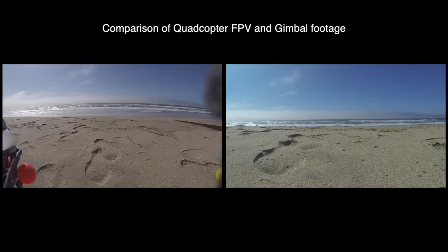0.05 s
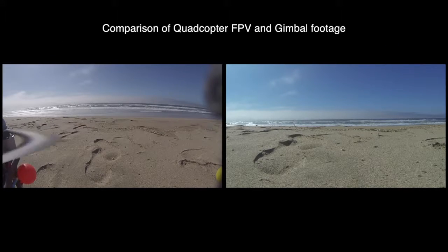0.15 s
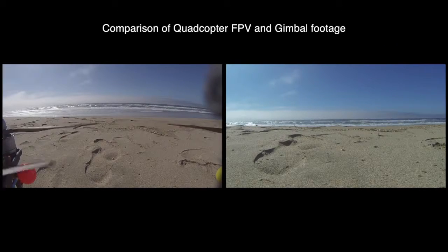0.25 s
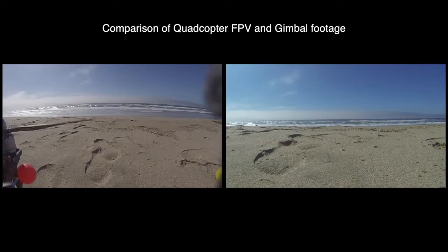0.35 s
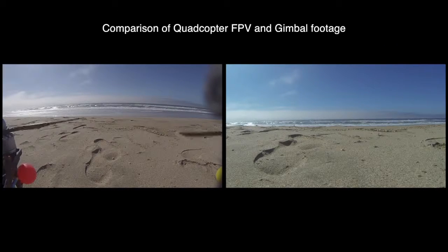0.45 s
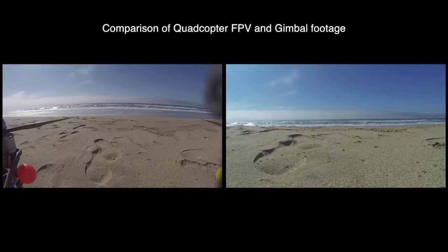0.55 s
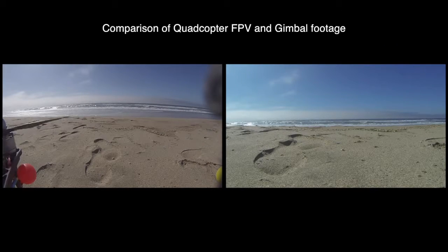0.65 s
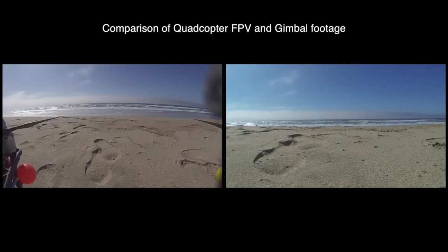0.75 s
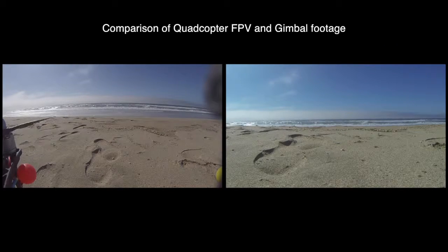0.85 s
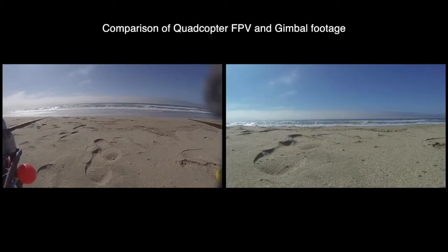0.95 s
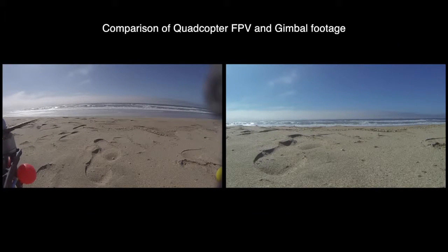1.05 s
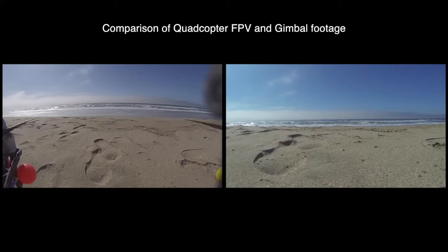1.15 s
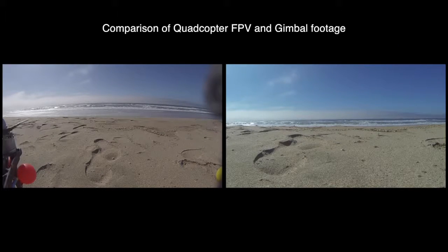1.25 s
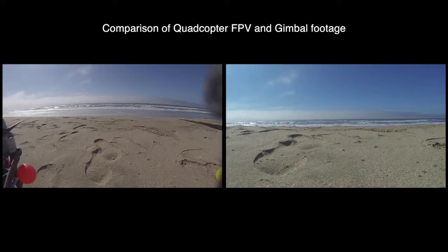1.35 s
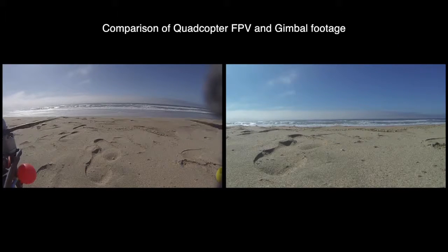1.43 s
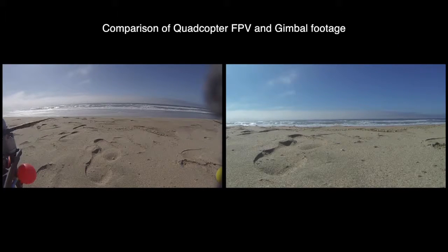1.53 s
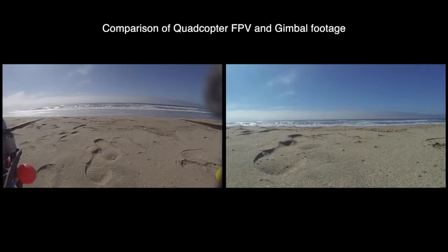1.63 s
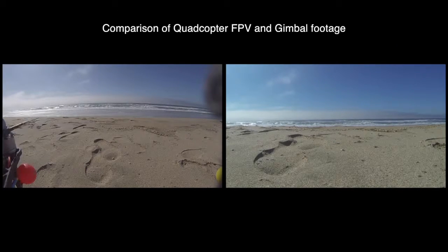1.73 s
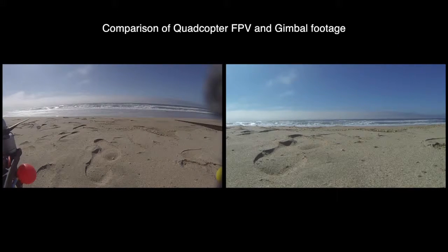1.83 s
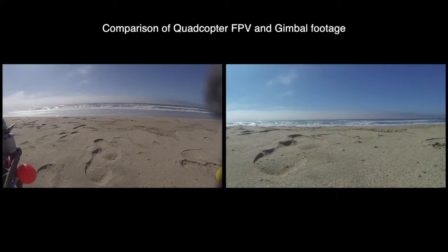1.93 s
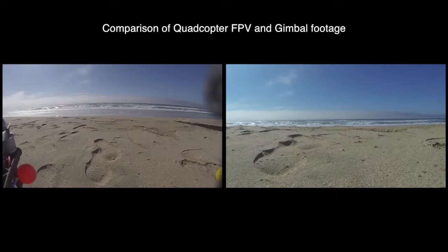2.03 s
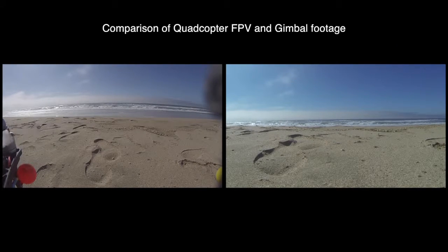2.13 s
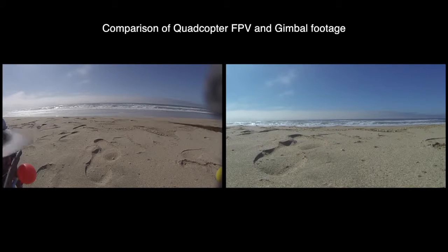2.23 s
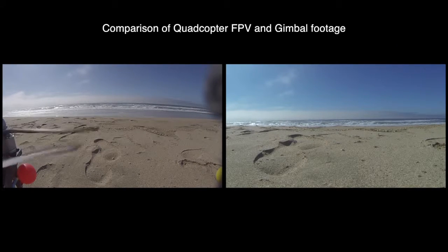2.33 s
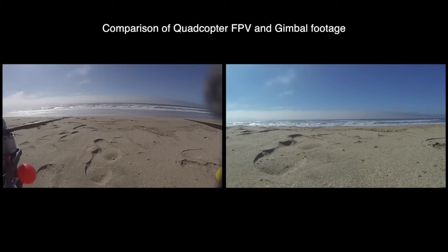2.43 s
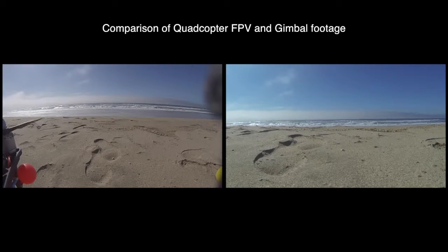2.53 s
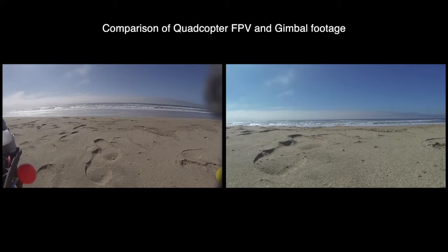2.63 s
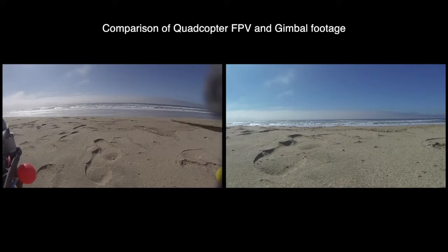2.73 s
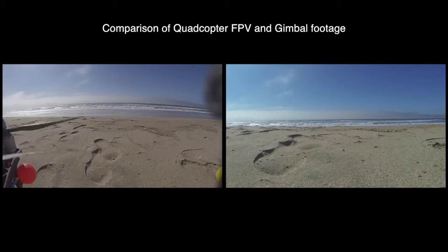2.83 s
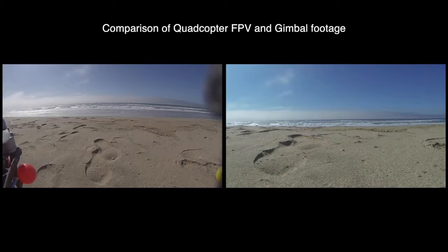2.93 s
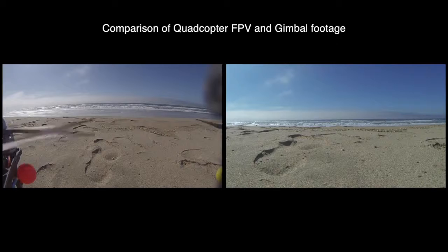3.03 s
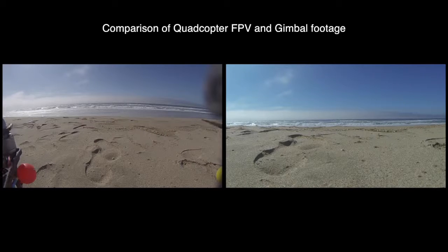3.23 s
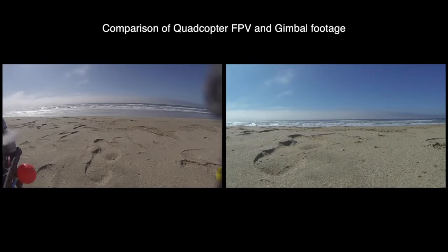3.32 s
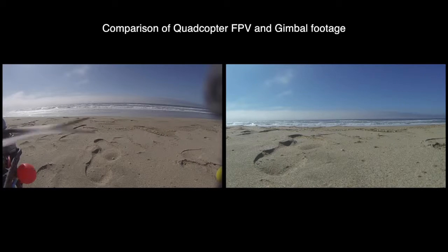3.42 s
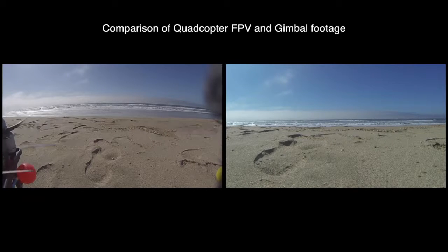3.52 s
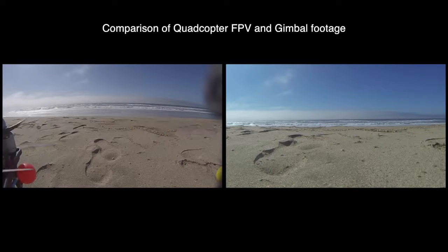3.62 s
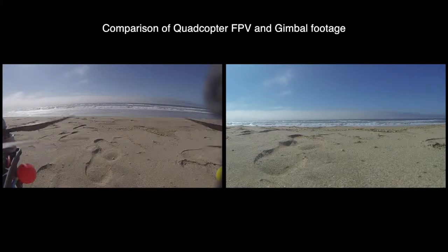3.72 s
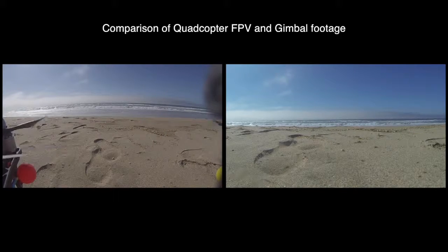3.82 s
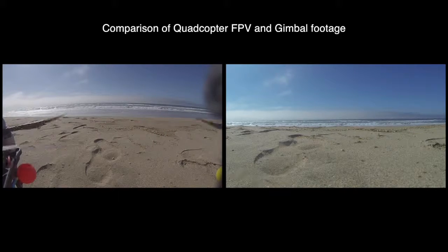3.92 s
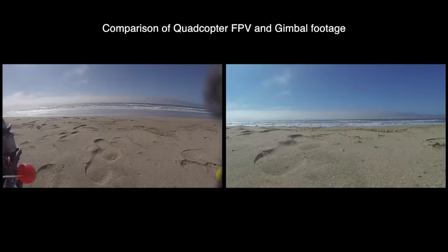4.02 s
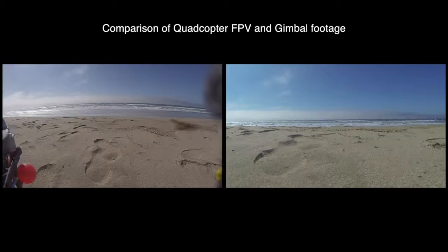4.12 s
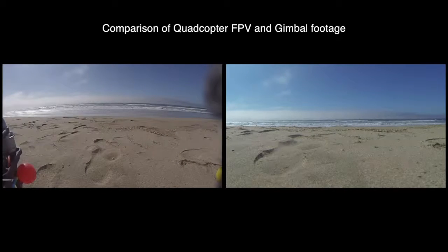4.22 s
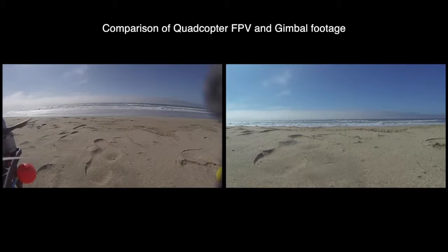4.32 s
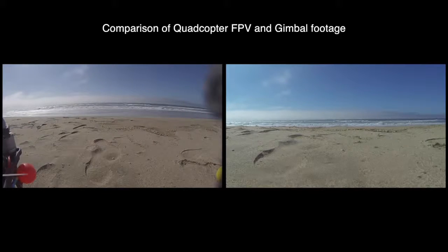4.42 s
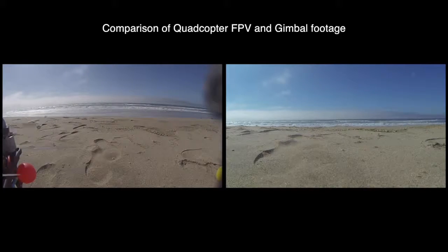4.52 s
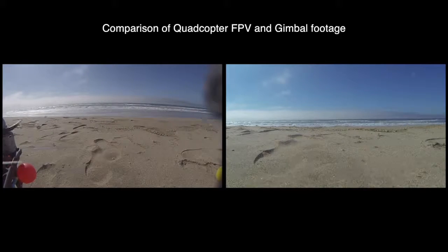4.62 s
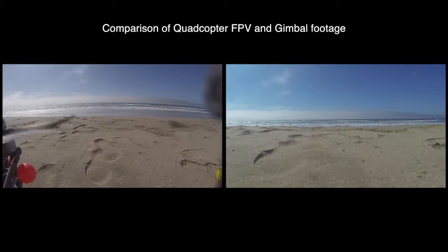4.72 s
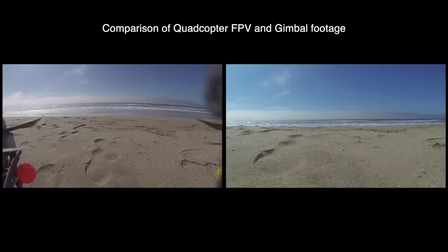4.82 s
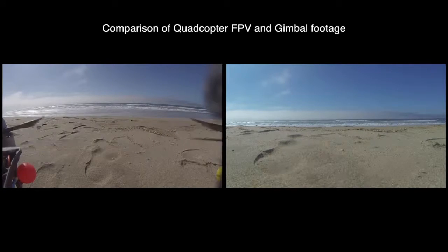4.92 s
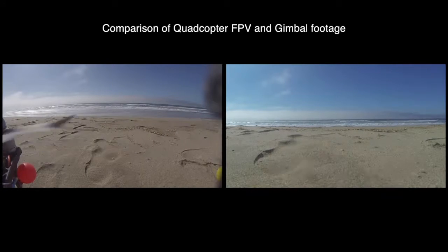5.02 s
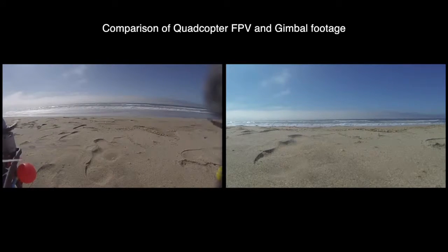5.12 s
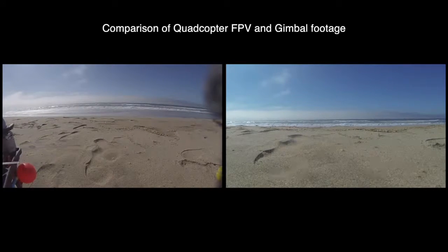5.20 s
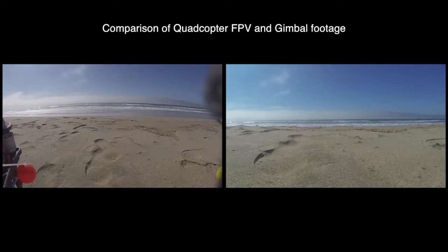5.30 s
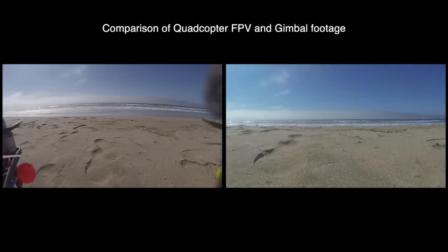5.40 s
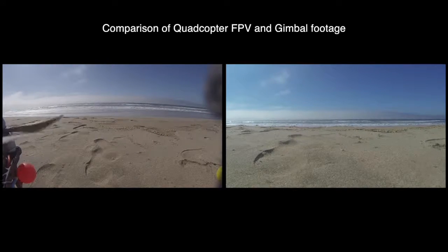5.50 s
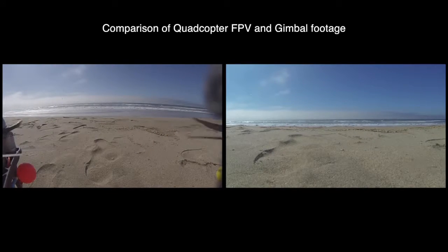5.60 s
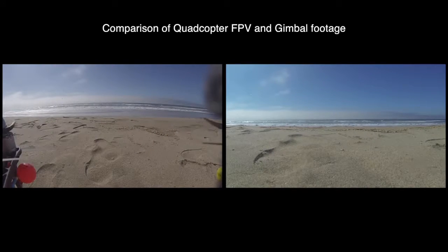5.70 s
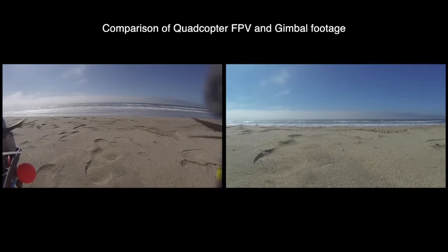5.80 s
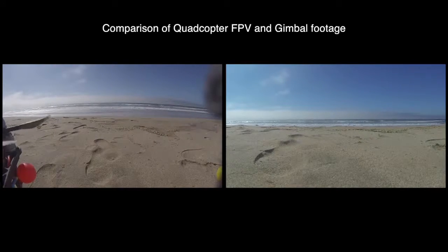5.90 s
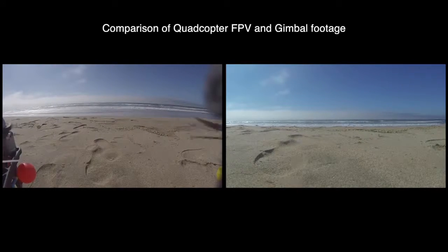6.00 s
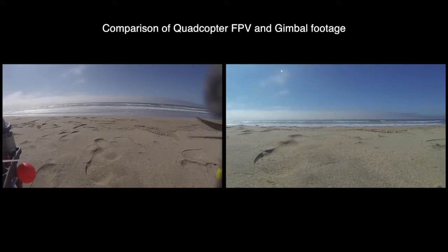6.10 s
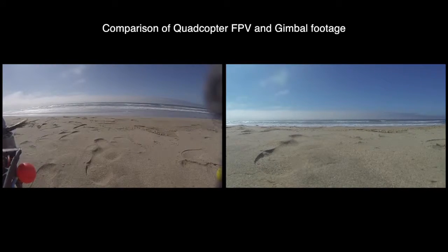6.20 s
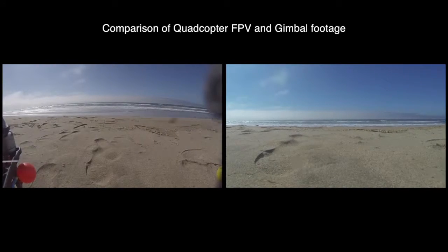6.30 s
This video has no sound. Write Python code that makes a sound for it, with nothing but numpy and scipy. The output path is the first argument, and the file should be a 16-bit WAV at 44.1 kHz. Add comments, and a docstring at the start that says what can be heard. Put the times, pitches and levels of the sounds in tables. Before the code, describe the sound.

A small drone idles with a faint high whine over surf, then spins up and lifts off with a rising buzz and gusting propeller wind.

```python
"""A quadcopter idles on a beach, spins up and lifts off, heard from a microphone on its frame.
Its two-bladed propellers hum, one pressure pulse per blade pass. Four motors sing at their
controllers' switching pitch and ring the frame. Once the throttle opens, the blades hiss and
blow gusts over the microphone. Surf washes behind throughout."""
import sys
import numpy as np
from scipy import signal
from scipy.fft import rfft, irfft
from scipy.io import wavfile
from scipy.ndimage import uniform_filter1d

SR = 44100
rng = np.random.default_rng(int(sys.argv[2]) if len(sys.argv) > 2 else 0)


def to_wav(s):
    """Save 16-bit WAV."""
    ch = np.atleast_2d(s).T  # columns
    pcm = np.round(np.clip(ch, -1, 1) * 32767)  # PCM
    wavfile.write(sys.argv[1], SR, pcm.astype(np.int16))


N = 280035
T = np.arange(N) / SR
HZ = np.fft.rfftfreq(N, 1 / SR)
THROTTLE_S, THROTTLE_RAMP_S = 2.439, 0.0079
LIFT_OFF_S, LIFT_OFF_RAMP_S = 3.5, 0.14
IDLE_HZ, LIFT_HZ = 39.28, 111  # blade-pass rates

# Common propeller speed, throttle open: (time [s], blade-pass rate [Hz])
BLADE_RATE = [(2.45, 41.2), (2.59, 55.5), (2.68, 63.4), (2.85, 73.45), (3.23, 96.65), (3.56, 114.6),
              (3.82, 124.5), (4.11, 135.9), (4.38, 144.6), (4.75, 154.1), (5.68, 177.3), (6.01, 183.8),
              (6.35, 198)]
# Lead of one propeller pair; odd harmonics dip at a half: (time [s], lead [blade passes])
PAIR_LEAD = [(0.88, 0.05), (1.02, 0.45), (2.55, 0.5), (2.7, 0.79), (3.09, 2.23), (3.2, 2.46), (3.59, 3.02),
             (4.01, 3.17), (4.32, 3.13), (4.76, 3.04), (5.26, 2.82), (5.55, 2.81), (5.98, 2.74),
             (6.02, 2.66), (6.35, 2.42)]
# Hum envelope: (time [s], gain [dB])
HUM_GAIN = [(0.03, -22.5), (2.27, -38), (2.86, -11.5), (3.07, -23.5), (3.17, -11.5), (3.67, -13.5),
            (3.98, -16), (4.39, -11.5), (4.83, -12), (5.97, -12), (6.35, -8)]
# Blade-pass harmonics 1-4: (relative level [dB])
BLADE_HARMONICS_DB = [0.3, -3.5, -9, -15.5]
# Motors: (switching pitch [Hz], speed / common speed [ratio])
MOTOR_TUNING = [(8021.9, .988), (8034.2, 1.), (8050.4, 1.011), (8077.2, 1.003)]
# Share of the whine per motor: (relative level [dB])
MOTOR_SHARE_DB = [-6, -4.5, -10, -4]
# Frame and housing resonances: (centre [Hz], width [Hz], gain [dB])
FRAME_MODES = [(2390, 590, -9), (3850, 890, -11), (4560, 190, -2), (4837, 270, 6.5), (7320, 730, -9),
               (8236, 610, -1), (15100, 600, -15)]
# Motor whistles: (switching pitch [multiple], magnet-pole rate [multiple], speed [ratio])
WHISTLE_ORDERS = [(1, -1, 1), (1, 1, 1), (1, -4, .98), (1, -4, .88), (1, -5, 1), (1, -7, .97), (0, 3, 1),
                  (0, 4, 1), (0, 4, 1), (0, 4, .905), (0, 5, 1), (0, 6, 1), (0, 6, 1), (0, 7, 1), (0, 9, 1)]
# Resonance of each whistle, same order: (centre [Hz], width [Hz], gain [dB])
WHISTLE_MODES = [(7850, 3400, -20), (8950, 2200, -23), (4750, 240, -8), (4490, 130, -11.5),
                 (4815, 300, -9.5), (4770, 260, -10), (2460, 1104, -21), (4952, 320, -0.5), (4640, 60, -10),
                 (4938, 530, -6), (4770, 315, -5), (4250, 1000, -19), (2520, 440, -23), (5000, 500, -23),
                 (6200, 1300, -28.5)]
# Surf and sea wind: (frequency [Hz], relative density [dB])
SURF_SPECTRUM = [(20, 3.5), (45, 1.5), (90, 0.5), (200, -2.5), (400, -7), (700, -13.5), (1200, -24.5),
                 (2000, -30), (3300, -34.5), (6500, -37.5), (10000, -44.5), (14000, -46.5)]
# Swell of the surf's low band: (time [s], gain [dB])
SURF_SWELL = [(0, -2), (1.0, -1.5), (1.5, 1), (2.3, 1.7), (3.0, 5.5)]
# Blade-tip turbulence: (frequency [Hz], relative density [dB])
HISS_SPECTRUM = [(200, 21), (1000, 5.5), (2500, 7), (4000, 6.5), (6500, 4.5), (9500, 1), (12000, -0.5),
                 (15000, 1)]
# Downwash rumble: (frequency [Hz], relative density [dB])
RUMBLE_SPECTRUM = [(15, 4), (35, 6.5), (70, 2.5), (130, -3), (250, -12), (450, -16), (800, -35),
                   (2000, -42)]
# Downwash bursts: (frequency [Hz], relative density [dB])
FLUTTER_SPECTRUM = [(60, -19), (250, -3.5), (600, 2), (1000, 2.5), (1500, -2.5), (2200, -12), (3200, -24.5),
                    (6000, -42), (14000, -34)]
# Downwash gusts: (time [s], half length [s], rumble boost [dB], flutter boost [dB])
WASH_GUSTS = [(3.06, 0.098, 8, -2), (3.4, 0.076, 7, -10), (3.694, 0.13, 4, 2.5), (3.962, 0.17, -1.5, 5),
              (4.16, 0.14, 8, 1), (4.438, 0.11, -4, 4), (4.688, 0.086, -1, 4.5), (5.238, 0.13, 4, 6),
              (5.786, 0.05, 6, 0.5), (6.027, 0.12, 6, 4.5)]
# Hard gusts on the microphone: (time [s], peak [dB], half length [ms])
GUST_POPS = [(3.012, -4, 3.6), (3.030, -7, .45), (3.0656, 0.5, .35), (3.093, -4.5, .77), (3.16, -11, 1.1),
             (3.555, -2.5, .28), (3.621, -6, 0.24), (3.627, -1.5, 0.23), (3.712, -10, 0.18),
             (3.7442, 9, .11), (3.946, -3, 0.18), (5.37, 3, 0.49)]
# Airstream: (frequency [Hz], relative density [dB])
RUSH_SPECTRUM = [(300, -7), (900, -2.5), (1700, 0.5), (2400, -3.5), (3500, -10.5), (6000, -16.5),
                 (14000, -26.5)]


def amp(db):
    """Decibels to gain."""
    return 10 ** (np.asarray(db) / 20)


def unit_rms(x):
    """Scales to rms 1."""
    return x / np.sqrt(np.mean(x ** 2) + 1e-20)


def curve(rows):
    """Linear interpolation of (time [s], value) rows."""
    return np.interp(T, *np.transpose(rows))


def coloured(x, spectrum):
    """Filters by a spectrum, to rms 1."""
    hz, db = np.transpose(spectrum)
    gain = amp(np.interp(np.log(HZ + 1), np.log(hz), db))
    return unit_rms(irfft(rfft(x) * gain, N))


def wander(rate_hz):
    """Low-passed noise, rms 1."""
    return unit_rms(irfft(rfft(rng.standard_normal(N)) * np.exp(-(HZ / rate_hz) ** 2), N))


def ramp(at_s, length_s):
    """0 to 1, centred on at_s."""
    return np.clip((T - at_s) / length_s + 0.5, 0, 1)


def bump(at_s, half_s):
    """Gaussian, peak 1."""
    return np.exp(-np.minimum(((T - at_s) / half_s) ** 2, 100))


def flight_gain(idle_db, ground_db, aloft_db):
    """Gain that switches at throttle-up and again at lift-off."""
    opened = ramp(THROTTLE_S, THROTTLE_RAMP_S)
    aloft = ramp(LIFT_OFF_S, LIFT_OFF_RAMP_S)
    return amp(idle_db + opened * (ground_db - idle_db) + aloft * (aloft_db - ground_db))


def propeller_hum(blade_rad, blade_hz, second_pair_db=-2.5, shake_depth=0.09):
    """Blade pulses: two pairs beat, turbulence shakes the harmonics, imbalance adds the shaft rate."""
    levels_db = list(BLADE_HARMONICS_DB) + [BLADE_HARMONICS_DB[-1] - db for db in (6, 12, 18)]
    lead_rad = np.pi * curve(PAIR_LEAD)
    second_gain = amp(second_pair_db)
    dull_db = 4 * (IDLE_HZ / blade_hz) ** 2  # slow blades make softer pulses
    hum = np.zeros(N)
    for k, db in enumerate(levels_db, 1):
        start_rad = rng.uniform(0, 2 * np.pi)
        leading = np.cos(k * (blade_rad + lead_rad) + start_rad)
        trailing = np.cos(k * (blade_rad - lead_rad) + start_rad)
        pairs = (leading + second_gain * trailing) / (1 + second_gain)
        hum += amp(db - dull_db * (k + 0.5)) * (1 + shake_depth * wander(33)) * pairs
    imbalance = amp(-37) * np.cos(blade_rad / 2)
    return np.sqrt(2) * (amp(curve(HUM_GAIN)) * hum + imbalance)


def current_ripple(shaft_rad, poles=14, pole_boost_db=5, size=8192):
    """Ripple repeating each shaft turn, boosted at multiples of the pole count."""
    k = np.arange(size // 2 + 1)
    in_band = (k > 0) & (k < size // 64)
    strength = in_band * amp(pole_boost_db * (k % poles == 0)) / (1 + k / 4.3)
    one_turn = unit_rms(irfft(strength * np.exp(2j * np.pi * rng.random(len(k)))))
    return np.interp(shaft_rad % (2 * np.pi), np.linspace(0, 2 * np.pi, size), one_turn)


def commutation_ticks(shaft_rad, steps_per_turn=42):
    """One tick per step of winding current; the uneven strengths repeat each turn."""
    position = steps_per_turn * shaft_rad / (2 * np.pi)
    step = np.floor(position).astype(int)
    at = np.flatnonzero(np.diff(step) > 0) + 1
    late_samples = (position[at] - step[at]) / (position[at] - position[at - 1])
    strength = rng.standard_normal(steps_per_turn)[step[at] % steps_per_turn]
    before = np.bincount(at - 1, strength * late_samples, N)
    after = np.bincount(at, strength * (1 - late_samples), N)
    return unit_rms(before + after)


def frame_ring(vibration, floor_db=-32):
    """Vibration reaches the microphone through the frame's resonances."""
    power = sum(amp(db) ** 2 / (1 + (2 * (HZ - hz) / width_hz) ** 2) ** 2
                for hz, width_hz, db in FRAME_MODES)
    return irfft(rfft(vibration) * np.sqrt(power + amp(floor_db) ** 2), N)


def motor_whine(blade_rad, blade_hz, ripple_db=-8, rasp_db=-5, octave_db=-5, slip_rad=0.0387):
    """Four switching tones beat; their sidebands and the commutation ticks ring the frame."""
    tones, sidebands, ticks = np.zeros((3, N))
    for (switch_hz, speed), db in zip(MOTOR_TUNING, MOTOR_SHARE_DB):
        shaft_rad = speed * blade_rad / 2 + slip_rad * wander(1.58)
        switch_rad = 2 * np.pi * (switch_hz * T + rng.random())
        tone = np.cos(switch_rad)
        octave = amp(octave_db) * np.cos(2 * switch_rad)
        tones += np.sqrt(2) * amp(db) * tone
        sidebands += np.sqrt(2) * amp(db) * (tone + octave) * current_ripple(shaft_rad)
        ticks += amp(db) * commutation_ticks(shaft_rad)
    rattle = ticks + amp(rasp_db) * rng.standard_normal(N)  # windings and bearings
    rattle /= 1 + (blade_hz / 108) ** 4  # fast rotors run smoothly
    return tones + frame_ring(amp(ripple_db) * sidebands + rattle)


def motor_whistles(blade_hz, twin_speed=1.03, twin_db=-10, flicker_db=2.5, jitter=0.0031, poles=14):
    """Torque ripple glides up, its images below the switching pitch down; each flares at a resonance."""
    switch_hz = MOTOR_TUNING[1][0]
    whistles = np.zeros(N)
    for speed, motor_db in [(1, 0), (twin_speed, twin_db)]:
        gain = amp(motor_db + flicker_db * wander(25))
        shaft_hz = speed * blade_hz / 2 * (1 + jitter * wander(46))  # turbulence shakes the shaft
        for (switch_order, pole_order, ratio), (hz, width_hz, db) in zip(WHISTLE_ORDERS, WHISTLE_MODES):
            pitch_hz = switch_order * switch_hz + pole_order * poles * ratio * shaft_hz
            flare = amp(db) / (1 + (2 * (pitch_hz - hz) / width_hz) ** 2) ** 1.66
            whistles += gain * flare * np.cos(2 * np.pi * (np.cumsum(pitch_hz) / SR + rng.random()))
    return np.sqrt(2) * whistles


def motor_gain(blade_hz, kick_s=0.041):
    """The whine jumps with the throttle, grows on the sand and fades toward full speed."""
    octaves = np.log2(blade_hz / LIFT_HZ)
    kick_db = 6 * np.exp(-abs(T - THROTTLE_S) / kick_s)
    return flight_gain(idle_db=-29, ground_db=-17 + 3.5 * octaves + kick_db, aloft_db=-20.5 - 11 * octaves)


def surf(gain_db=-24, drift_db=0.5, swell_below_hz=500, comb_gain=0.37, comb_delay_s=0.0232):
    """Breakers and sea wind; the low band swells. A delayed copy, mixed in, gives a faint hollow colour."""
    wash = coloured(rng.standard_normal(N), SURF_SPECTRUM)
    low = signal.sosfiltfilt(signal.butter(2, swell_below_hz, fs=SR, output="sos"), wash)
    wash += (amp(curve(SURF_SWELL)) - 1) * low
    wash *= amp(drift_db * wander(2.7))
    delayed = np.roll(wash, round(comb_delay_s * SR))
    return amp(gain_db) * (wash + comb_gain * delayed)


def blade_hiss(blade_rad, blade_hz, dull_above_hz=10500):
    """Tip turbulence spits at each blade pass; duller when slow, swelling once early in the climb."""
    spit = 1 + 1.3 * np.exp(3 * (np.cos(blade_rad) - 1))
    hiss = coloured(rng.standard_normal(N), HISS_SPECTRUM) * unit_rms(spit)
    treble = signal.sosfiltfilt(signal.butter(2, dull_above_hz, "high", fs=SR, output="sos"), hiss)
    hiss -= np.interp(blade_hz, [85, 120], [0.66, 0]) * treble
    octaves = np.log2(blade_hz / LIFT_HZ)
    ground_db = -24.5 + 7 * octaves
    aloft_db = -28 - octaves + 3 * bump(at_s=4.334, half_s=0.34)
    return flight_gain(ground_db, ground_db, aloft_db) * hiss


def downwash_gains(blade_hz, full_hz=79):
    """Rumble and flutter build with speed and vary in gusts; flutter leaps just after lift-off."""
    octaves = np.minimum(np.log2(blade_hz / full_hz), 0)
    rumble_db = -23.5 + 19 * octaves + 0.6 * wander(4.1)
    flutter_db = -35 + 11 * octaves + 9 * ramp(LIFT_OFF_S + 0.082, length_s=0.1)
    for at_s, half_s, rumble_boost_db, flutter_boost_db in WASH_GUSTS:
        gust = bump(at_s, half_s)
        rumble_db += rumble_boost_db * gust
        flutter_db += flutter_boost_db * gust
    return amp(rumble_db), amp(flutter_db)


def downwash(blade_rad, blade_hz, chop_depth=0.5, ragged_at_s=3.83, build_s=0.71, calm_s=1.44):
    """Eddies hit the microphone: rumble, plus bursts at the blade rate, most ragged just off the sand."""
    rumble_gain, flutter_gain = downwash_gains(blade_hz)
    rumble = coloured(rng.standard_normal(N), RUMBLE_SPECTRUM)
    spread_db = 5 * np.exp(-np.maximum((ragged_at_s - T) / build_s, (T - ragged_at_s) / calm_s))
    bursts = amp(spread_db * wander(390) + wander(48)) * (1 + chop_depth * np.cos(blade_rad))
    bursts /= np.sqrt(uniform_filter1d(bursts ** 2, SR // 5))
    eddies = bursts * rng.standard_normal(N)
    dull = coloured(eddies, FLUTTER_SPECTRUM)
    bright = coloured(eddies, [(1.5 * hz, db) for hz, db in FLUTTER_SPECTRUM])
    fast = np.interp(blade_hz, [128, 168], [0, 1])  # faster air, brighter bursts
    flutter = (1 - fast) * dull + fast * bright
    return rumble_gain * rumble + flutter_gain * flutter


def gust_pops():
    """Each hard gust is one short pressure bump."""
    return sum(amp(db) * bump(at_s, half_ms / 1000) for at_s, db, half_ms in GUST_POPS)


def airstream_rush(blade_hz, ref_db=-30, ref_hz=160, grain_db=2, gust_db=2.14):
    """The airstream's rush grows steeply with propeller speed."""
    roughness = amp(grain_db * wander(220) + gust_db * wander(21))
    rush = coloured(rng.standard_normal(N) * roughness, RUSH_SPECTRUM)
    return amp(ref_db) * (blade_hz / ref_hz) ** 5.8 * rush


def scene():
    """One propeller speed drives hum, motors and air noise, over the surf."""
    target_hz = curve([(THROTTLE_S - THROTTLE_RAMP_S, IDLE_HZ)] + list(BLADE_RATE))
    blade_hz = uniform_filter1d(target_hz, SR // 10)  # rotor inertia
    blade_rad = 2 * np.pi * np.cumsum(blade_hz) / SR
    airflow = np.clip((T - THROTTLE_S) / 0.08, 0, 1)  # air lags the throttle
    hum = propeller_hum(blade_rad, blade_hz)
    motors = motor_gain(blade_hz) * (motor_whine(blade_rad, blade_hz) + motor_whistles(blade_hz))
    air = airflow * (blade_hiss(blade_rad, blade_hz) + downwash(blade_rad, blade_hz))
    return (hum + motors + surf() + air + gust_pops() + airstream_rush(blade_hz))[None]


def record(dry, cutoff_hz=15480):
    """Hard limit at full scale, then low-pass."""
    lowpass = signal.firwin(511, cutoff_hz, window=("kaiser", 9), fs=SR)
    return signal.oaconvolve(np.clip(dry, -1, 1), lowpass[None], "same")


dry = scene()
out = record(dry)
to_wav(out)
```